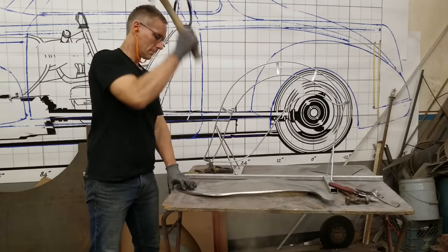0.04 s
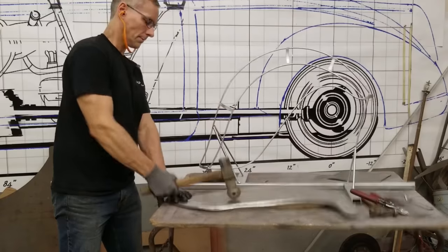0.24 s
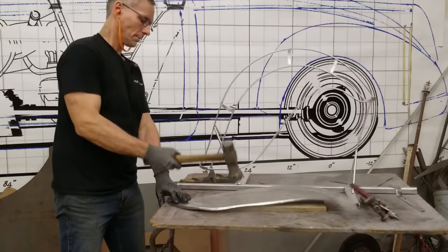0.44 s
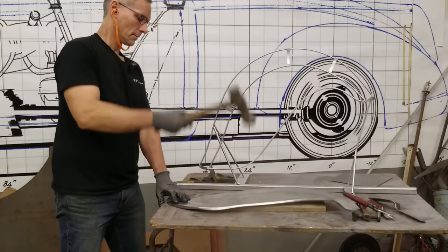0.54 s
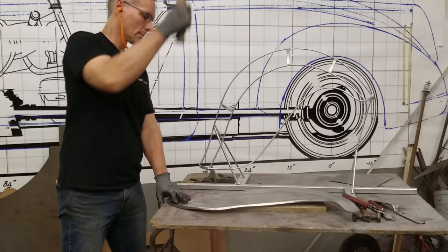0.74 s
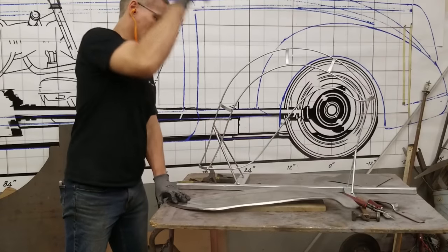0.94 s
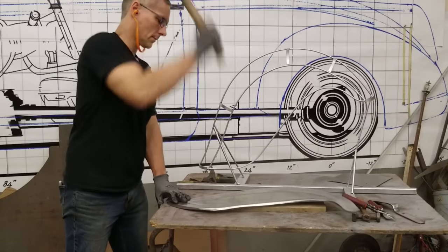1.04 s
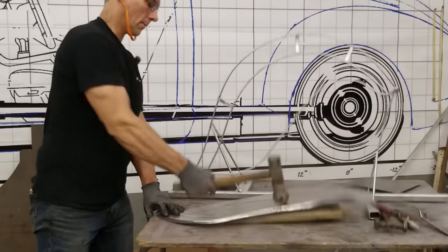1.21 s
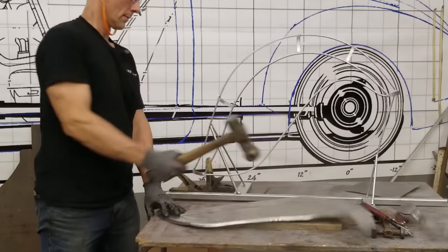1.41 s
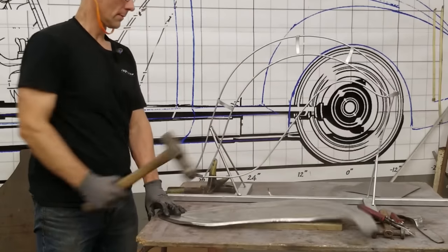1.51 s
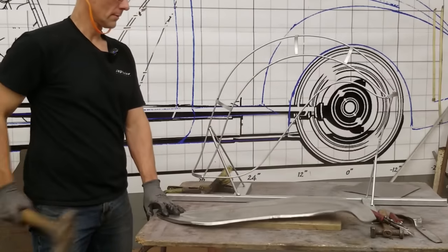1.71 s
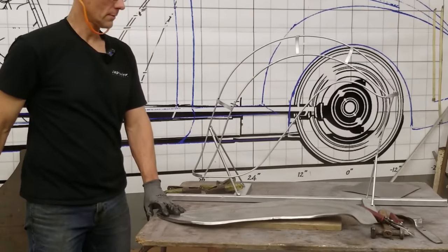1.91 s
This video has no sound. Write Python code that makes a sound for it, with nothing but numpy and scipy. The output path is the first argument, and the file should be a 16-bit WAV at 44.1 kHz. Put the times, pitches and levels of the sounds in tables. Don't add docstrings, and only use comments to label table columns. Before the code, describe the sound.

Two heavy hammer blows crash on sheet metal over a booming steel table, clattering and ringing

```python
import sys
import numpy as np
from scipy import signal
from scipy.io import wavfile

SR = 44100
rng = np.random.default_rng(int(sys.argv[2]) if len(sys.argv) > 2 else 0)


def volts_from_decibels(level):
    exponent = np.asarray(level, float) / 20
    return 10 ** exponent


def transcribe(u):
    v = np.clip(np.atleast_2d(u).T, -1, 1)
    q = np.round(v * 32767).astype(np.int16)
    wavfile.write(sys.argv[1], SR, q)


N = 85995
LEAD = int(0.8 * SR)
M = N + LEAD


def at_hz(points, hz):
    table_hz, value = np.transpose(points)
    return np.interp(np.log(hz), np.log(table_hz), value)


def clicks(s, size):
    out = np.full(M, 1e-18)
    np.add.at(out, (np.asarray(s) * SR).astype(int) + LEAD, size)
    return out


def fade(x, t60):
    return signal.lfilter([1], [1, -volts_from_decibels(-60 / (t60 * SR))], x)


def swell(x, s):
    r = np.exp(-1 / (s * SR))
    return signal.lfilter([1 - r], [1, -r], x)


def soft(x):
    contact_s = 0.0004
    return swell(swell(swell(x, contact_s), contact_s / 2), contact_s / 2)


def ring(x, hz, t60):
    r, w = volts_from_decibels(-60 / (t60 * SR)), 2 * np.pi * hz / SR
    return signal.lfilter([0, np.sin(w)], [1, -2 * r * np.cos(w), r * r], x)


def drift(rate):
    knots = rng.standard_normal(400)
    return np.interp(np.arange(M) / SR * rate, np.arange(len(knots)), knots)


def noise_bands():
    edges = 40 * 2 ** np.arange(0, 8.8, 1 / 3)
    white = rng.standard_normal((2, M))
    out = []
    for k, (lo, hi) in enumerate(zip(edges, edges[1:])):
        band = signal.butter(2, [lo, hi], "band", fs=SR, output="sos")
        out.append((np.sqrt(lo * hi), signal.sosfilt(band, white[k % 2])))
    return out


def near(hz, centre_hz, width_oct):
    return np.exp(-(np.log2(hz / centre_hz) / width_oct) ** 2)


# hz, level_db (per Hz)
FLOOR = [(40, -11), (140, -3.5), (250, 10), (600, -12), (1800, -35.5), (2800, -40.5), (15000, -74.5)]


def workshop_floor(noises):
    floor = sum(noise * volts_from_decibels(at_hz(FLOOR, hz)) for hz, noise in noises)
    return volts_from_decibels(-48.5) * floor / floor.std()


# start_s, level_db
BLOWS = [
    (-.72, 4.5),
    (.2225, -2),
    (1.1727, -2),
]


def hammer_blows(level_db, scatter_db=0):
    s, db = np.transpose(BLOWS)
    return clicks(s, volts_from_decibels(db + level_db + rng.normal(0, scatter_db, len(s))))


# hz, level_db (per Hz)
CRASH = [(50, -7), (120, -2), (300, 1), (800, -3), (2000, -10), (4500, -17.5), (9000, -31), (16000, -33.5)]
# hz, t60_s
CRASH_T60 = [(60, 0.66), (250, 1), (800, 0.88), (2500, 0.78), (6000, 0.59), (15000, 0.5)]


def crash(noises):
    thump_s, thump_db, thump_hz = np.transpose(THUMPS)
    shared = drift(37.4)
    out = 0
    for hz, noise in noises:
        blow = fade(hammer_blows(18 + at_hz(CRASH, hz)), at_hz(CRASH_T60, hz))
        blow = swell(blow, 1 / hz)
        thump = fade(clicks(thump_s, volts_from_decibels(thump_db - 6) * near(hz, thump_hz, 1.0)), 0.55)
        patch = volts_from_decibels(-0.5 * (2.4 * shared + drift(25) + 1.2 * drift(9)))
        out = out + noise * patch * np.hypot(blow, thump)
    return out


# pitch_hz, level_db, t60_s
SHEET = [(297.3, -3, 1.08), (394.6, -4, 1.07), (511.6, -1.5, 1.1), (757.4, -4, 0.89), (892, -2, 0.99),
         (1011, -5.5, 1.2), (1077, -7, 0.76), (1320, -24, 0.46), (1560, -27.5, 0.66), (1586, -14, 0.8),
         (2110, -11.5, 0.65), (2530, -8, 0.28), (2830, -18.5, .58)]


def sheet():
    return sum(ring(-hammer_blows(db - 10, 0.84), hz, t60) for hz, db, t60 in SHEET)


# pitch_hz, level_db, t60_s
FRAME = [(1750, -36, 1.6), (2350, -35, 1.3), (3408, -24, .9), (3881, -24, .8), (5288, -26, .5)]


def frame():
    s = np.transpose(BLOWS)[0]
    return sum(ring(clicks(s, volts_from_decibels(db + rng.normal(0, 2, len(s)))), hz, t60) for hz, db, t60 in FRAME)


# pitch_hz, level_db, t60_s
BOOM = [(102.75, -18, 1.21), (110.9, -9, 1.41), (96.1, -7.5, 1.14)]


def boom():
    boom = sum(ring(hammer_blows(db), hz, t60) for hz, db, t60 in BOOM)
    held_back = fade(clicks(np.transpose(BLOWS)[0], 1.), 0.07).clip(0, 1)
    return boom * (1 - held_back)


# start_s, level_db, pitch_hz
THUMPS = [(.005, -23, 370), (0.029, -41.5, 300), (.073, -41, 273), (.167, -33.5, 300), (.428, -4, 480),
          (.446, -8, 420), (.463, -8, 250), (.516, -7, 330), (.541, -7, 380), (.56, -9, 330),
          (.572, -8, 320), (.592, -11, 300), (.684, -17, 330), (.768, -16, 330), (.783, -21, 300),
          (.823, -20, 280), (.855, -17, 280), (.87, -24, 210), (1.029, -27, 293), (1.098, -28, 252),
          (1.41, -4, 700), (1.468, -8, 480), (1.483, -6, 480), (1.535, -6, 330), (1.66, -17, 220),
          (1.68, -18, 350), (1.745, -49, 300), (1.869, -27.5, 296), (1.924, -24, 430)]


def thumps():
    out = 0
    for s, db, hz in THUMPS:
        t60 = 7 / hz
        knock = ring(clicks(s, 1.), hz, t60)
        overtone = 0.29 * ring(clicks(s, 0.84), 1.77 * hz, t60)
        out = out + volts_from_decibels(db + 5) * (knock + overtone)
    return soft(out)


def chatter():
    rock = fade(hammer_blows(-9), 1.1)
    born = rng.random(M) < 80 / SR
    taps = -rock * volts_from_decibels(6.3 * rng.standard_normal(M)) * born
    dealt = rng.integers(0, 4, M)
    return soft(sum(ring(taps * (dealt == k) + 1e-18, hz, 3.3 / hz)
                    for k, hz in enumerate([232, 300, 378, 530])))


def rattle():
    shake = fade(hammer_blows(-9), 0.28) * volts_from_decibels(4 * drift(20))
    sizes = volts_from_decibels(3.5 * np.minimum(rng.exponential(1, M), 4)) * rng.choice([-1, 1], M)
    born = rng.random(M) < 130 / SR
    contacts = shake * sizes * born
    pitches, dealt = np.geomspace(450, 6000, 14), rng.integers(0, 14, M)
    return sum(ring(contacts * (dealt == k) + 1e-18, hz, 19 / hz) * (200 / hz) ** 0.34
               for k, hz in enumerate(pitches))


# start_s, level_db, pitch_hz
CLACKS = [(.161, -61, 4000), (.29, -30, 2960), (0.322, -18, 2950), (0.374, -33, 3020), (0.425, -23, 5160),
          (0.516, -33, 8700), (.558, -23, 2320), (.578, -24, 1760), (0.581, -43, 9000), (.662, -47, 9500),
          (.665, -35, 1920), (.8, -58, 5900), (1.289, -38, 5200), (1.373, -45, 8200), (1.387, -22, 5800),
          (1.3875, -37, 12100), (1.388, -6.5, 1956), (1.394, -54, 8000), (1.428, -12.5, 2620),
          (1.445, -38, 2540), (1.483, -49, 5070), (1.506, -35.5, 7300), (1.568, -47, 11400),
          (1.69, -61, 9000), (1.775, -61, 8000), (1.9167, -40.5, 3530), (1.9168, -54, 9900),
          (1.919, -32.5, 1750), (1.93, -35, 1103), (1.943, -39, 1770)]


def clack_noise(noises):
    s, db, clack_hz = np.transpose(CLACKS)
    out = 0
    for hz, noise in noises:
        hits = clicks(s, volts_from_decibels(db - 1) * near(hz, clack_hz, 0.9))
        burst = fade(hits, 0.03)
        tail = volts_from_decibels(-17) * fade(hits, 0.53)
        out = out + noise * (burst + tail)
    return out


def clack_rings():
    out = 0
    for s, db, hz in CLACKS:
        a, b = rng.uniform(-0.97, 1, 2)
        for half_octaves, size in ((0, 1), (a, .4), (b, .4)):
            out = out + volts_from_decibels(db - 3) * size * ring(clicks(s, 1.), hz * 2 ** (.5 * half_octaves), 80 / hz)
    return out


# pitch_hz, level_db, t60_s
BANG = [(572, 8, 0.042), (700, 6.5, 0.027), (933, 9, 0.057)]


def bang():
    return sum(ring(swell(-hammer_blows(db), 0.00012), hz, t60) for hz, db, t60 in BANG)


# start_s, end_s, level_db, pitch_hz
HEAVES = [
    (0.269, 0.394, -10, 108.6),
    (1.211, 1.335, -6, 106.7),
]


def heaves():
    t = (np.arange(M) - LEAD) / SR
    edge_s = 0.0051
    out = 0
    for start, end, db, hz in HEAVES:
        free = swell(swell(1. * (t > start) * (t < end), edge_s), edge_s)
        out = out + volts_from_decibels(db) * np.sin(2 * np.pi * hz * t) * free
    return out


# start_s, level_db, pitch_hz
JOLTS = [(.297, 8.5, 60.3), (0.421, -14, 100), (0.468, -4, 108), (0.549, -26, 88), (0.601, -9, 90),
         (.72, -24, 80.4), (.78, -24, 90), (1.331, 0.5, 65), (1.419, -16, 108), (1.599, -10, 104),
         (1.65, -11, 110.5)]


def jolts():
    return sum(volts_from_decibels(db) * ring(swell(clicks(s, 0.7), 0.0027), hz, 5.4 / hz) for s, db, hz in JOLTS)


def scene():
    noises = noise_bands()
    metal = crash(noises) + sheet() + frame() + bang()
    table = boom() + heaves() + jolts()
    fender = thumps() + chatter()
    tools = rattle() + clack_noise(noises) + clack_rings()
    return (workshop_floor(noises) + metal + table + fender + tools)[None, LEAD:]


def band_limit(x):
    return signal.sosfilt(signal.butter(12, 16850, fs=SR, output="sos"), x)


def record(dry):
    overload, knee = 0.23, 3.0
    flat = dry / (1 + np.abs(dry / overload) ** knee) ** (1 / knee)
    cuts = np.vstack([signal.butter(1, 188, "high", fs=SR, output="sos"),
                      signal.butter(4, 59, "high", fs=SR, output="sos"),
                      signal.butter(1, 9000, fs=SR, output="sos"),
                      signal.cheby2(12, 45, 16400, fs=SR, output="sos")])
    return band_limit(signal.sosfilt(cuts, flat))


dry = scene()
out = record(dry)
transcribe(out)
```